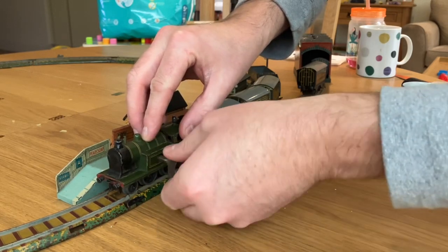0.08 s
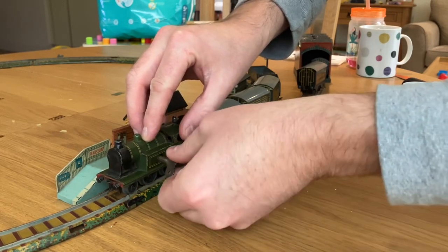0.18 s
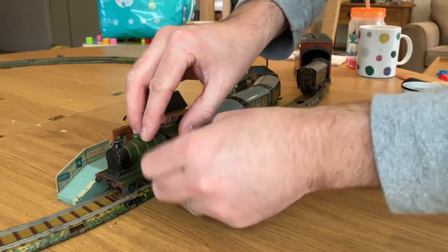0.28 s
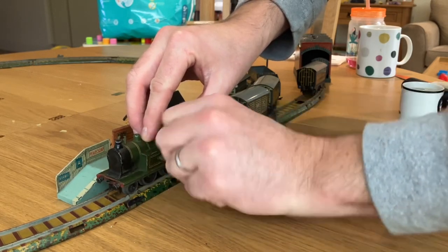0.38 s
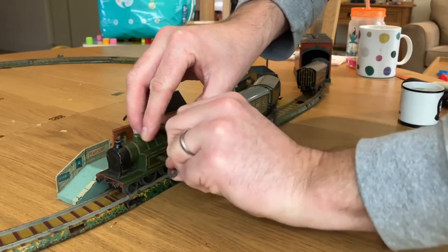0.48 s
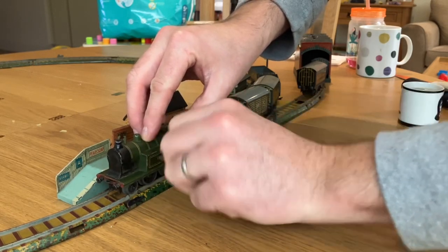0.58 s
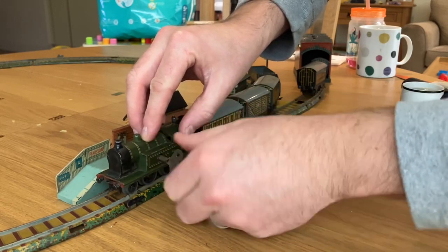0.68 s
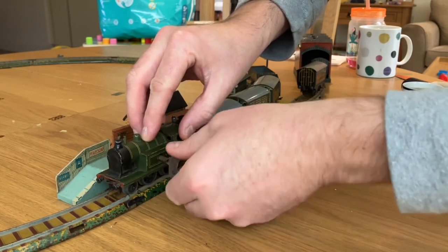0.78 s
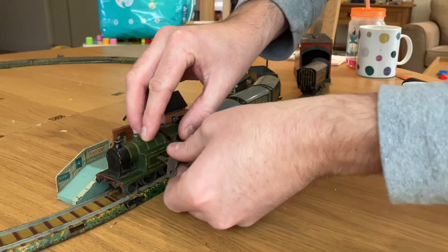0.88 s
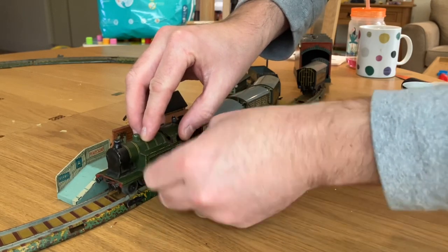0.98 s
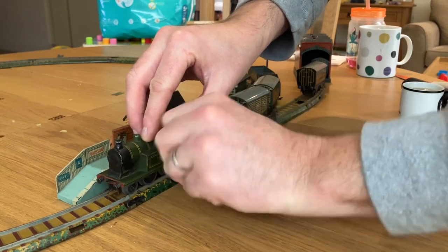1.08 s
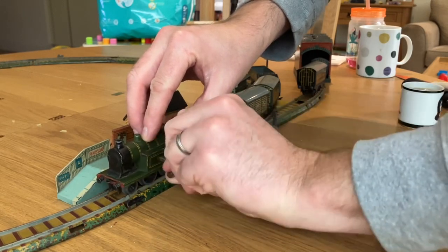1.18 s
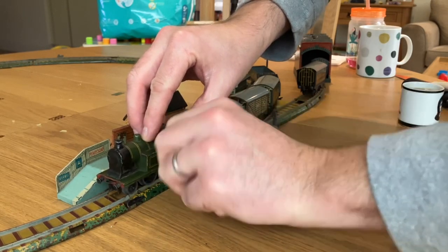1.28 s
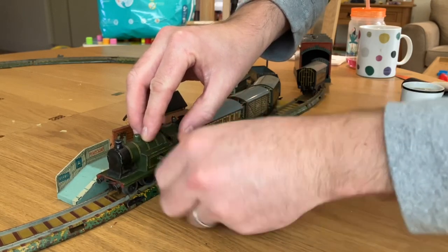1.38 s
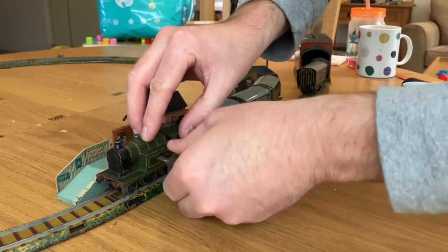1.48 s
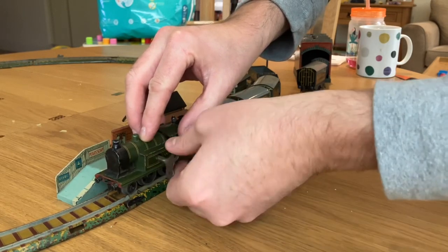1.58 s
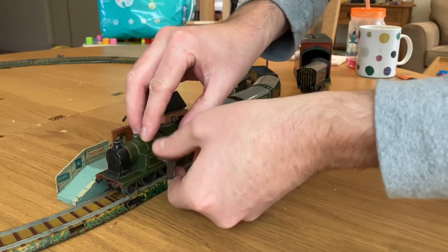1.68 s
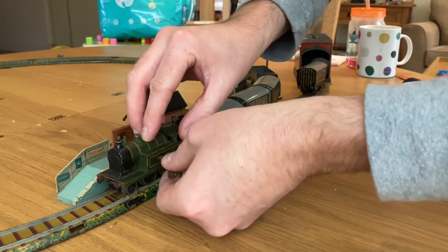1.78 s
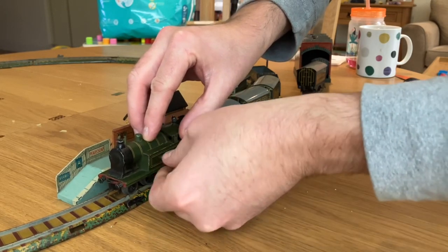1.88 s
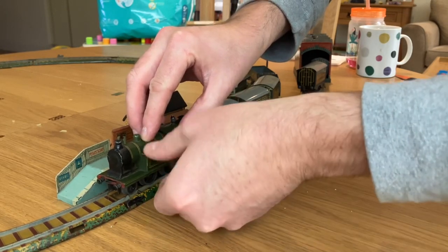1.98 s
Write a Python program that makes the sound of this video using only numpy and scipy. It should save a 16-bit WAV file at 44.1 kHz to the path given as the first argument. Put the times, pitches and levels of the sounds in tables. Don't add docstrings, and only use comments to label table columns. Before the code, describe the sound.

A tin toy train is wound by key, close up in stereo in a quiet, slightly live living room. Light key ticks come at 0.15-0.2 s, then four hard, bright, pinging ratchet snaps at 0.24-0.45 s. A soft regrip and table thump follow near 0.7 s, key ticks at 0.88 s, four faster snaps at 0.97-1.13 s, then ticks, skin rub, dull knocks and wheels rattling on rails from 1.5 s.

```python
import sys
import numpy as np
from scipy import signal
from scipy.fft import rfft, irfft
from scipy.io import wavfile
from scipy.ndimage import uniform_filter1d

SR = 44100
rng = np.random.default_rng(int(sys.argv[2]) if len(sys.argv) > 2 else 0)


def gain_from_decibels(decibels):
    exponent = np.asarray(decibels, float) / 20
    return 10 ** exponent


def master(y):
    cut = np.clip(np.atleast_2d(y).T, -1, 1)
    pcm = np.round(cut * 32767)
    wavfile.write(sys.argv[1], SR, pcm.astype(np.int16))


N = 88200


def at_hz(points, hz):
    p = np.array(points)
    return np.interp(np.log(hz + 1), np.log(p[:, 0]), p[:, 1])


def in_time(rows):
    seconds, db = np.transpose(rows)
    return gain_from_decibels(np.interp(np.arange(N) / SR, seconds, db))


def butter(x, order, hz, kind):
    return signal.sosfilt(signal.butter(order, hz, kind, fs=SR, output="sos"), x)


def ring(push, hz, t60):
    r = gain_from_decibels(-60 / (max(t60, .002) * SR))
    w = 2 * np.pi * min(hz, 19000) / SR
    return signal.lfilter([0, np.sin(w)], [1, -2 * r * np.cos(w), r * r], push + 1e-18)


# frequency [Hz], level [dB].
AIR_COLOUR = [(15, -23.5), (25, 4.5), (868, -28), (1810, -45), (2320, -11.5), (3890, -10.5), (4710, -18.5),
              (15700, -30), (17000, -67)]


def room_air():
    colour = gain_from_decibels(at_hz(AIR_COLOUR, np.fft.rfftfreq(N, 1 / SR)))
    air = irfft(rfft(rng.standard_normal((2, N))) * colour, N)
    return gain_from_decibels(-65) * air / air.std()


# frequency [Hz], level [dB], decay time t60 [s].
WOOD_MODES = [(58.2, -10, 0.052), (91.7, -7, 0.034), (114.4, -7.5, 0.13), (161, -13, 0.11),
              (200.8, -12.5, 0.12), (228, -14, 0.066), (306, -10, 0.03), (379, -14, 0.028),
              (462, -13.5, 0.022), (651, -21.5, 0.028)]
# time [s], level [dB].
HAND_PRESSURE = [(0.0, -69.5), (0.2, -62.5), (0.37, -52), (0.6, -62), (0.71, -116), (0.81, -74),
                 (0.93, -58.5), (1.03, -47), (1.21, -65.5), (1.6, -67.5), (1.73, -64), (2.0, -52.5)]


def hand_pressure():
    lumps = rng.standard_normal((len(WOOD_MODES), N)) * (rng.random(N) < 150 / SR)
    lumps = lumps * in_time(HAND_PRESSURE)
    out = np.zeros(N)
    for lump, (hz, db, t60) in zip(lumps, WOOD_MODES):
        tilt_db = -1.5 + 3.8 * np.log2(hz / 116)
        out += gain_from_decibels(db) * ring(gain_from_decibels(tilt_db) * lump, hz, t60)
    return out


HIT_SPREAD_DB = 1.5


def slips(rows, modes, part_on, tilt_on, lag_s=0, rise=1 / 3, spring_hz=None, per_s=7000):
    out = np.zeros(N + 8000)
    t = np.arange(5000) / SR
    mode_hz, mode_db, mode_t60 = np.transpose(modes)
    for k, (s, db, part_db, ms, tilt) in enumerate(rows):
        rise_s = rise * ms / 1000
        shape = (1 - np.exp(-t / rise_s)) ** 2 * np.exp(-t / (ms / 2000))
        chance, size = rng.random((2, len(t)))
        contacts = (chance < per_s / SR) * np.log(size)
        bursts = shape * contacts * rng.standard_normal((len(modes), len(t)))

        level_draw, pitch_draw = rng.standard_normal((2, len(modes)))
        pitch = mode_hz * (1 + .015 * pitch_draw)
        if spring_hz is not None:
            pitch[7] = spring_hz[k]
        body_db = part_on * part_db + tilt_on * tilt * np.log2(pitch / 2000)
        gain = gain_from_decibels(db - 8.5 + mode_db + body_db + HIT_SPREAD_DB * level_draw)

        i = int((s + lag_s - rise_s) * SR)
        for push, hz, g, t60 in zip(bursts, pitch, gain, mode_t60):
            rung = ring(push, hz, t60)
            click_energy = max(t60, .002) * SR / (4 * np.log(1000))
            out[i:i + len(t)] += g * rung * np.sqrt(click_energy / np.sum(rung ** 2))
    return out[:N]


# time [s], peak [dB], bright part [dB], length [ms], tilt [dB per octave].
WHEEL_NUDGES = [(0.017, -62.5, 2.5, 8.7, 22), (0.85, -54, -34, 15, -4), (1.512, -36, -21, 24, -1),
                (1.532, -43, -16, 15, -2), (1.583, -37.5, -27, 18, 5), (1.645, -43, -13, 22, 1.5),
                (1.668, -49, -23, 8.8, -2.5), (1.722, -58, -27, 14, 0), (1.9, -44.5, -22, 12, 1.5),
                (1.887, -36, -37, 20, 1), (1.916, -50, -23, 17, 1), (1.936, -45, -14, 14.6, 11),
                (1.969, -35, -16.5, 12.7, -3)]
# time [s], level [dB].
RAIL_SHUFFLE = [(0, -78), (.1, -82.5), (.6, -79), (.8, -87), (1.4, -91.5), (1.5, -71), (1.6, -85),
                (1.72, -77), (1.86, -76.5), (1.92, -61.5), (2, -76.5)]
# frequency [Hz], level [dB], decay time t60 [s].
RAIL_MODES = [(659, -10, 0.0049), (810, -6.5, 0.0078), (977, -9.5, 0.047), (1197, 7.5, 0.0066),
              (1260, 2, 0.011), (1560, -4, 0.024), (1846, -5.5, 0.037), (3140, -1, 0.0047)]
# frequency [Hz], level [dB], t60 [s].
PAWL_MODES = [(4540, 1.5, 0.0053), (5350, 8.5, 0.015), (6630, -1.5, 0.036), (8750, 15.5, 0.001),
              (9000, -14, 0.0016), (9470, 16, 0.0015), (9800, 8.5, 0.0019), (12020, 7, 0.0084),
              (13300, 16, 0.0017), (15800, 1.5, 0.001)]


def wheels():
    nudges = slips(WHEEL_NUDGES, RAIL_MODES, 0, 1, rise=.03, per_s=900)
    nudges = nudges + slips(WHEEL_NUDGES, PAWL_MODES, 1, 0, rise=.03)
    grit = (rng.random(N) < 500 / SR) * rng.standard_normal((len(RAIL_MODES), N))
    grit = grit * in_time(RAIL_SHUFFLE)
    shuffle = sum(gain_from_decibels(db) * ring(g, hz, t60) for g, (hz, db, t60) in zip(grit, RAIL_MODES))
    return butter(nudges + gain_from_decibels(9.5) * shuffle, 2, 500, "high")


# time [s], peak [dB], tin body [dB], slip length [ms], body tilt [dB per octave].
KEY_PLAY = [(0.1447, -31.5, -5, 2.9, 2), (0.1472, -30.5, 1.5, 3.2, -1), (0.2066, -36.5, 8, 3.2, -5),
            (0.5062, -30, -3.5, 3.44, -5), (0.5987, -45.5, 1.5, 4.7, -2), (0.8818, -32.5, -21, 3.9, -10),
            (0.8842, -29.5, -1, 4.17, -2.5), (0.968, -47.5, 4.5, 6, 11.5), (1.2424, -38, -5, 2.76, -6),
            (1.2444, -28.5, 4, 3.83, -3), (1.2697, -34.5, 3.5, 2.6, -8), (1.4808, -45.5, -5, 4.4, 3),
            (1.5767, -53.5, 10, 3.9, 4.5), (1.7612, -36, -2, 3.7, 6), (1.7637, -32, 3, 2.74, -7.5),
            (1.7665, -40, 7, 2.06, -3), (1.932, -48.5, -4, 2.6, 10), (1.9173, -48.5, 7, 7.4, 2)]
# time [s], level [dB], tin body [dB], length [ms], body tilt [dB per octave].
SKIN_RUBS = [
    (0.696, -43.5, -37, 49, -30),
    (1.421, -44.5, -13.5, 57, 12),
    (1.552, -52.5, 4, 40, -4),
]
# frequency [Hz], level [dB], decay time t60 [s].
SHANK_MODES = [(5440, 8, 0.0065), (6200, -0.5, 0.0087), (6940, 1.5, 0.012), (7630, 0, 0.015),
               (8700, 13, .003), (9400, 12, 0.0046), (11280, 5, 0.0092), (12500, 3.5, 0.0026),
               (13400, 8, .003), (15200, 8, 0.0059)]
# frequency [Hz], level [dB], decay time t60 [s].
KEY_TIN_MODES = [(968, -12.5, 0.034), (1306, -8.5, 0.042), (1625, 0.5, 0.017), (1810, -18.5, 0.025),
                 (2120, -5.5, 0.029), (2580, -1, 0.021), (3030, 4, 0.018), (3360, 6.5, 0.019),
                 (4010, 2.5, 0.017), (4700, 1, 0.015)]
BODY_LAG_S = 0.000856


def key():
    touches = KEY_PLAY + SKIN_RUBS
    return slips(touches, SHANK_MODES, 0, 0) + slips(touches, KEY_TIN_MODES, 1, 1, BODY_LAG_S)


# time [s], peak [dB], sharp part [dB].
TABLE_KNOCKS = [(0.178, -41.5, -7.5), (0.242, -42.5, -3), (0.299, -41, 0), (0.445, -41.5, -2.5),
                (0.521, -45, -11), (0.566, -55, -7), (0.631, -63, -6.5), (0.6899, -36, -7),
                (0.716, -54, -8.5), (0.739, -51.5, -7.5), (0.754, -50.5, -12), (0.775, -53.5, -11.5),
                (0.796, -63.5, -5), (0.918, -54.5, -19), (0.973, -39, -5.5), (1.022, -38, -2),
                (1.068, -40, -7), (1.122, -56.5, 6), (1.271, -42.5, -5), (1.287, -36, -9),
                (1.416, -38.5, -8.5), (1.443, -49.5, -11), (1.519, -54, 2.5), (1.579, -56, -7),
                (1.707, -46, -8), (1.797, -42, -7.5), (1.829, -60.5, 4), (1.93, -39, -12), (1.97, -55, 3)]


def knocks():
    out = np.zeros(N + SR)
    draws = rng.standard_normal((len(TABLE_KNOCKS), len(WOOD_MODES), 2))
    click = np.eye(1, SR // 4)[0]
    for k, (hz, db, t60) in enumerate(WOOD_MODES):
        sign = (-1) ** (k // 3)
        for (s, hit_db, sharp_db), draw in zip(TABLE_KNOCKS, draws):
            level_draw, pitch_draw = draw[k]
            tilt_db = (sharp_db + 8) * np.log2(hz / 116)
            gain = sign * gain_from_decibels(db + hit_db - 3 + HIT_SPREAD_DB * level_draw + tilt_db)
            i = int(s * SR)
            out[i:i + len(click)] += gain * ring(click, hz * (1 + .015 * pitch_draw), t60)
    return out[:N]


# time [s], peak [dB], tin body [dB], slip length [ms], body tilt [dB per octave].
TOOTH_SNAPS = [
    (0.2423, -11, -12.5, 1.95, -8),
    (0.3019, -12.5, -8.5, 1.86, -5.5),
    (0.355, -13, -16.5, 2.56, 5.5),
    (0.4478, -9.5, -18, 1.45, -1.5),
    (0.972, -11, -11.5, 1.29, -7),
    (1.0237, -13, -11.5, 1.21, -1.5),
    (1.066, -13, -10.5, 1.42, -9),
    (1.1261, -14, -16.5, 1.17, 6),
]
# time [s], peak [dB], frequency [Hz].
SPRING_PITCH = [(0.2418, -8, 11650), (0.3007, -12, 12360), (0.3536, -23, 11500), (0.4469, -10, 12360),
                (0.9712, -16, 12120), (1.0226, -14, 12400), (1.065, -9, 11700), (1.1248, -10, 11380)]
# frequency [Hz], level [dB], decay time t60 [s].
TIN_MODES = [(938, -17.5, 0.068), (1019, -20, 0.14), (1217, -40.5, 0.074), (1350, -10, 0.028),
             (1515, -14.5, 0.013), (1611, -4, 0.035), (1709, -7, 0.062), (2170, -7.5, 0.027),
             (2570, 1, 0.02), (2765, 6, 0.0054), (2973, 11, 0.034), (3080, 10, 0.0055),
             (3420, -9.5, 0.0067), (4104, 11.5, 0.0083)]


def ratchet():
    hard = [(hz, db + 14.5 * np.log2(hz / 12000), t60) for hz, db, t60 in PAWL_MODES]
    short = np.array(TOOTH_SNAPS) * [1, 1, 1, .5, 1]
    pawl = slips(short, hard, 0, 0, spring_hz=np.array(SPRING_PITCH)[:, 2])
    body = slips(TOOTH_SNAPS, TIN_MODES, 1, 1, BODY_LAG_S)
    loose = [(s + .004, db - 7.5, part, 15, tilt) for s, db, part, _, tilt in TOOTH_SNAPS]
    return pawl + body + slips(loose, KEY_TIN_MODES, 1, 1, rise=.1, per_s=1500)


def clockwork():
    return butter(key() + ratchet(), 4, 1110, "high") + wheels()


def table():
    return butter(hand_pressure() + knocks(), 2, [60, 700], "band")


def scattered(x):
    wobble = uniform_filter1d(rng.standard_normal(N), size=40)
    turns = 300 * np.cumsum(wobble / wobble.std()) / SR
    smeared = np.real(signal.hilbert(x) * np.exp(2j * np.pi * turns))
    return butter(smeared, 4, 900, "high")


# frequency [Hz], t60 [s].
ROOM_DECAY = [(100, 0.32), (1000, 0.31), (3000, 0.4), (8000, 0.39), (16000, 0.6)]
# frequency [Hz], level [dB].
TAIL_COLOUR = [(100, 7), (1000, -11), (3000, -13), (8000, -17.5), (16000, -34)]


def room(x):
    t = np.arange(SR) / SR
    edges = 60 * 2 ** np.arange(0, 8.3, .5)
    white = rng.standard_normal((2, 2, SR))
    tail = 0
    for k, (low, high) in enumerate(zip(edges, edges[1:])):
        hz = np.sqrt(low * high)
        level_db = at_hz(TAIL_COLOUR, hz) - 21.5 - 60 * t / at_hz(ROOM_DECAY, hz)
        tail = tail + butter(white[k % 2], 2, [low, high], "band") * gain_from_decibels(level_db)
    tail = tail * (1 - np.exp(-(t / .004) ** 2))
    return signal.fftconvolve(x[None], tail)[:, :N]


# frequency [Hz], left lead [radians].
LEFT_LEAD = [(0, 0), (1600, 1.2), (2300, 2.0), (2900, 2.8), (3600, 1.7), (4650, 2.9), (5340, 2.4),
             (6950, 0), (17000, -14.2)]
# frequency [Hz], likeness [0 to 1].
LIKENESS = [(60, .92), (300, .65), (600, .55), (1200, .72), (2500, .62), (5000, .55), (7000, .995),
            (16000, .999)]
# frequency [Hz], left over right [dB].
LEFT_OVER_RIGHT = [(60, 3.4), (500, 3.2), (1400, 1.6), (3000, 3.1), (6000, 0), (16000, -.3)]


def scene():
    tin, wood = clockwork(), table()
    echo_delay = int(.0165 * SR)
    direct = tin + wood + gain_from_decibels(-24) * np.pad(tin, (echo_delay, 0))[:N]
    diffuse = room(scattered(tin) + gain_from_decibels(-6) * wood) + room_air()

    size = N + 4096
    hz = np.fft.rfftfreq(size, 1 / SR)
    near = rfft(direct, size)
    one, other = rfft(diffuse, size)
    like = at_hz(LIKENESS, hz)
    same = np.sqrt((1 + like) / 2) * (near + one)
    apart = np.sqrt((1 - like) / 2) * (other + rfft(clockwork(), size))
    lead = np.exp(.5j * np.interp(hz, *np.transpose(LEFT_LEAD)))
    turn = lead * gain_from_decibels(at_hz(LEFT_OVER_RIGHT, hz) / 2)
    return irfft([(same + apart) * turn, (same - apart) / turn], size)[:, :N]


def band_limit(x):
    return signal.sosfilt(signal.butter(12, 17140, fs=SR, output="sos"), x)


def record(dry):
    mix = signal.sosfilt(signal.cheby2(12, 70, 17000, fs=SR, output="sos"), dry)
    return band_limit(mix)


dry = scene()
out = record(dry)
master(out)
```